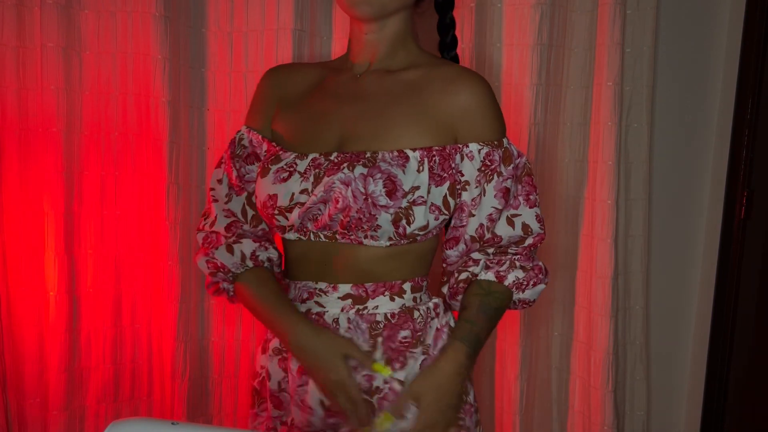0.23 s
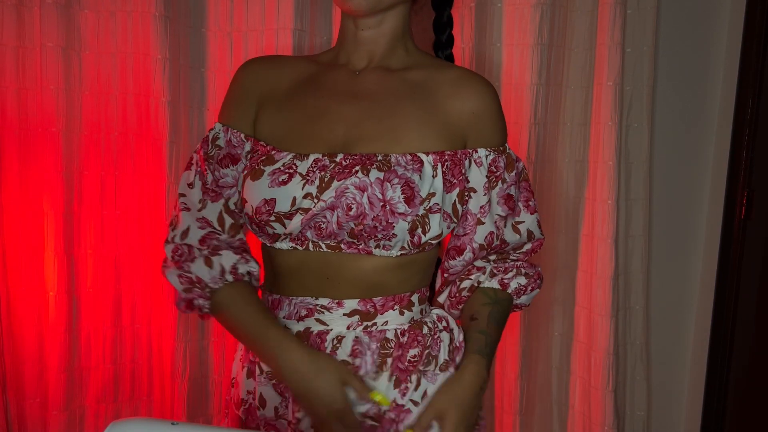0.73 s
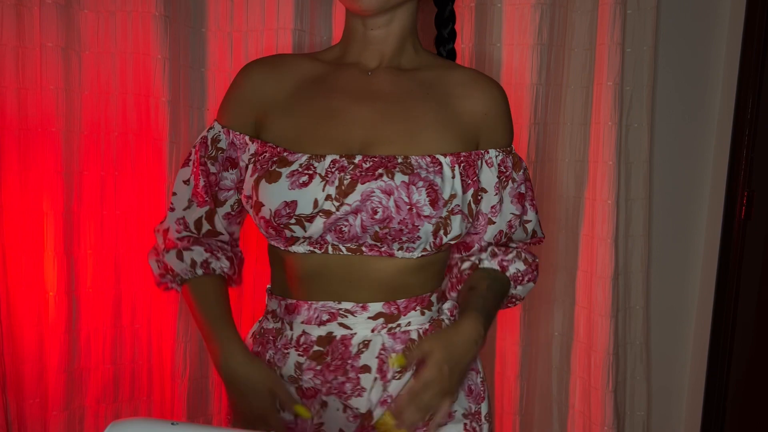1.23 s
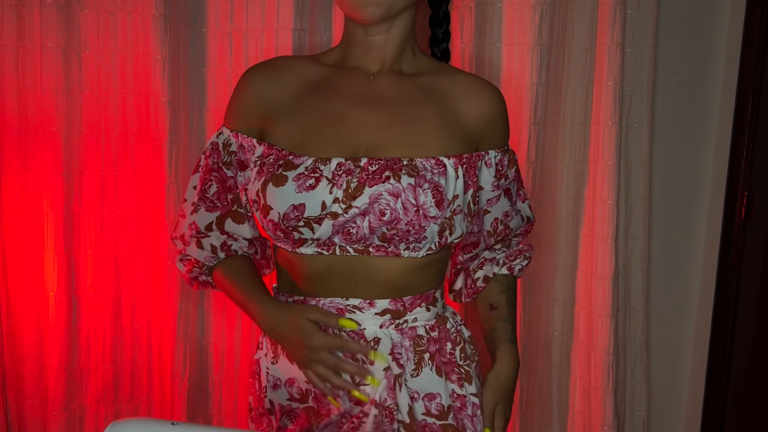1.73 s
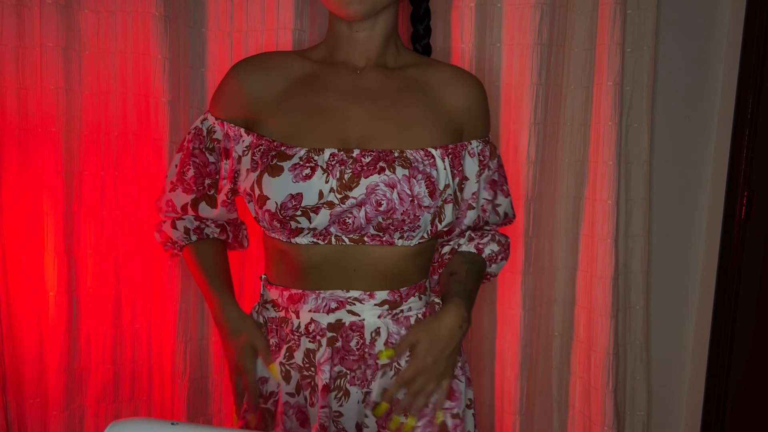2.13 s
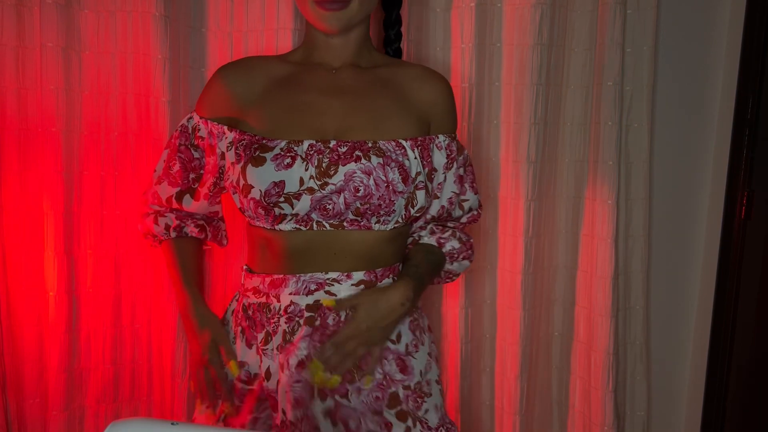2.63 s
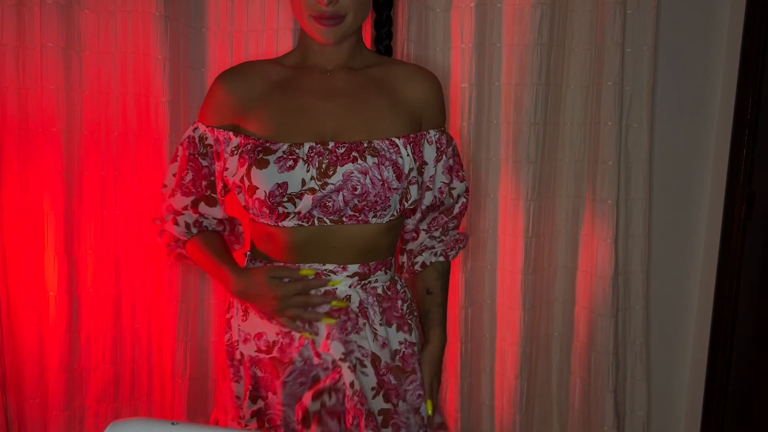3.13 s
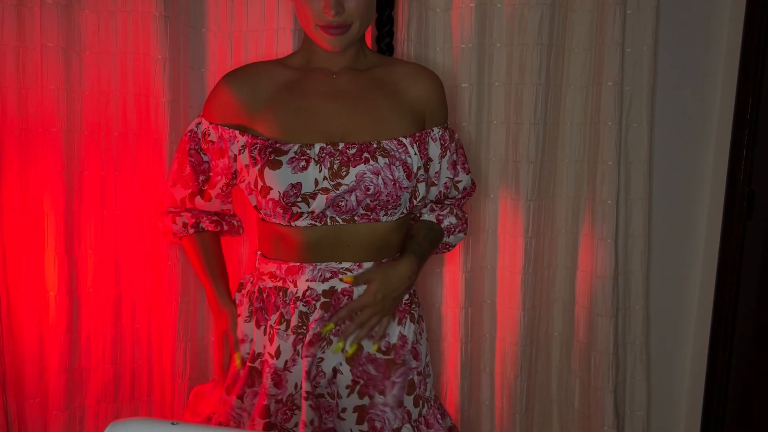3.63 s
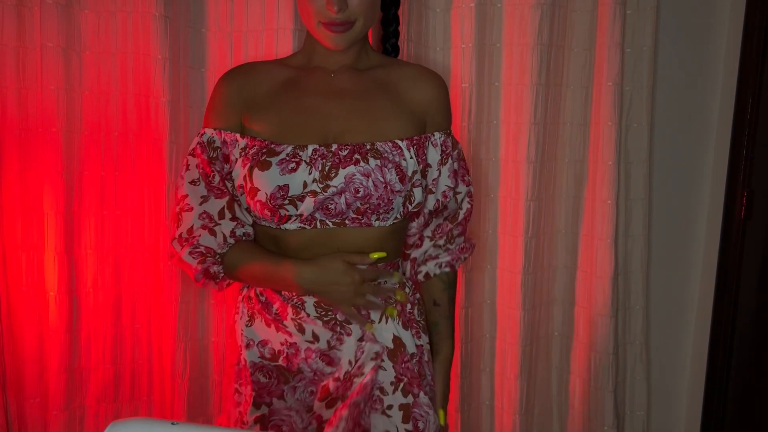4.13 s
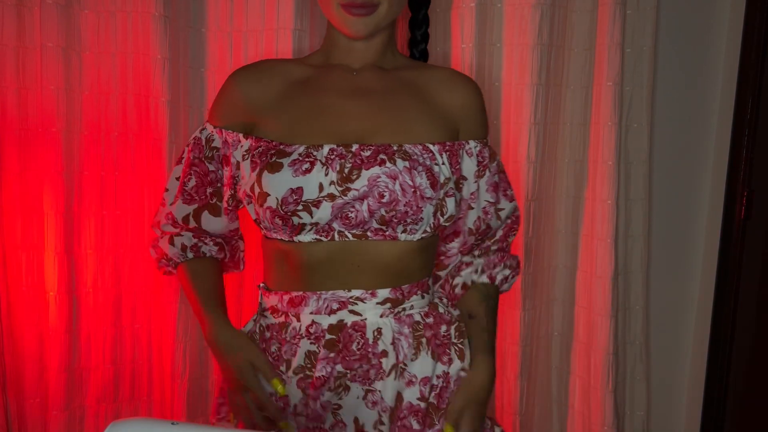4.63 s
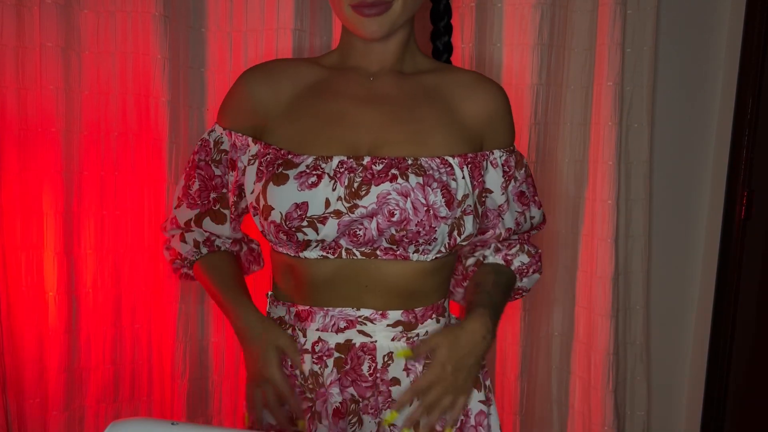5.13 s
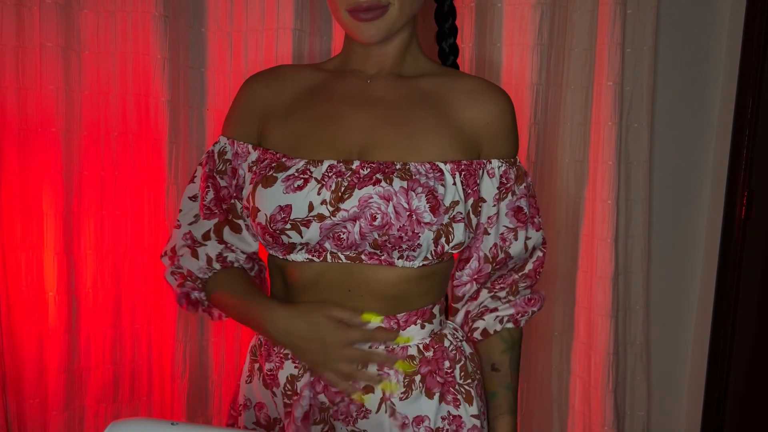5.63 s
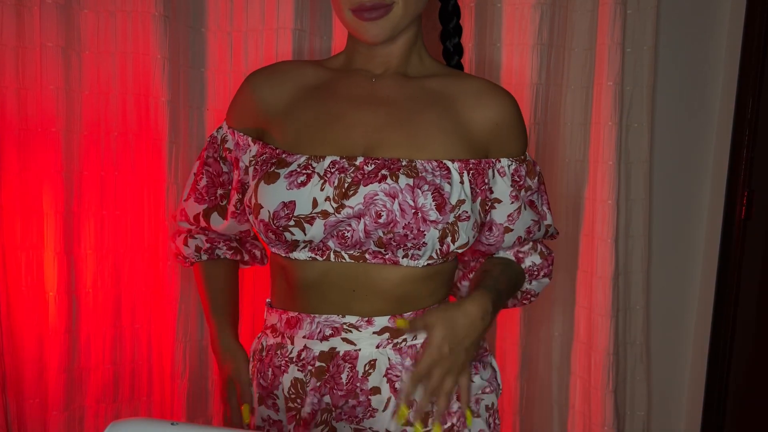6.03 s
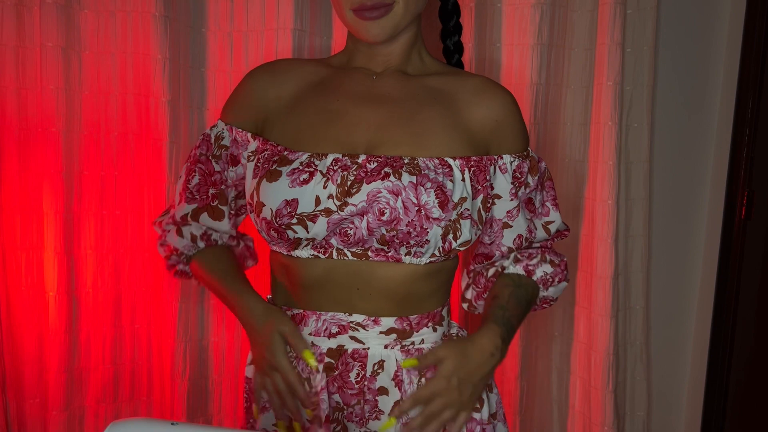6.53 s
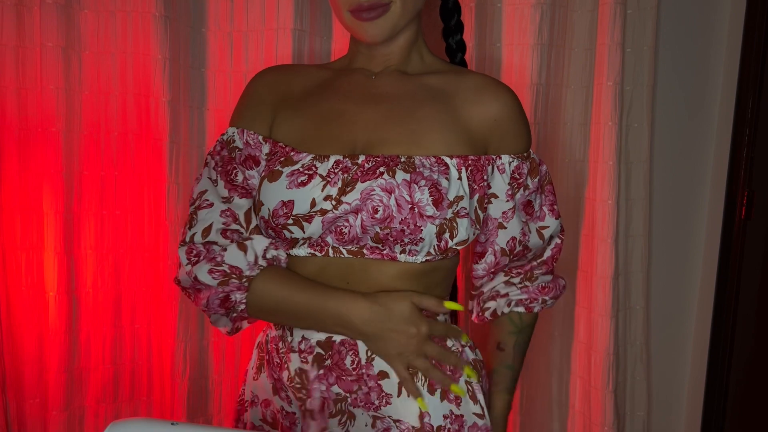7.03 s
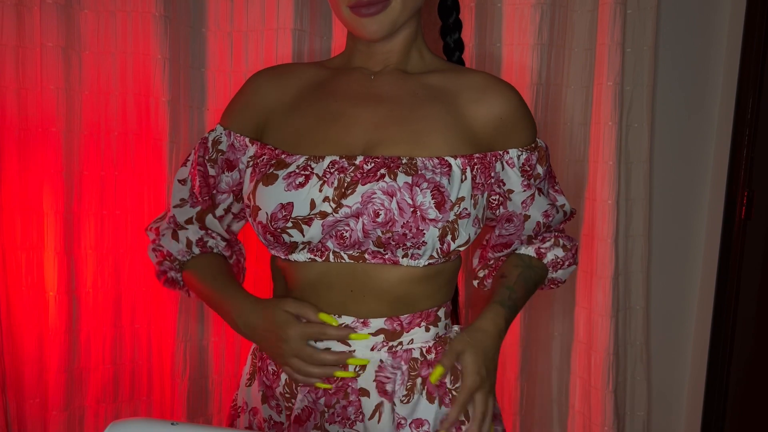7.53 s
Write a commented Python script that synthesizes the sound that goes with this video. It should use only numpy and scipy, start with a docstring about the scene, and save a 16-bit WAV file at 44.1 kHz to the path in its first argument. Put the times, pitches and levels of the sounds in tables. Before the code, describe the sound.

In a quiet room, close to one microphone, long nails rub to and fro over a cotton skirt. Each stroke is a bright, grainy hiss of about a third of a second that swells and sinks as the hand turns. Short zips, small dry snaps of folds and soft low pushes of air from the swinging cloth come irregularly beneath it.

```python
"""A quiet room, one close microphone: long fingernails sweep to and fro over a cotton skirt.
Noise impulses, thread by thread, are coloured as nails, fibres and dragged cloth; the hiss sinks at each turn.
Short noise swells zip where the weave briefly has a pitch, and short damped waves snap as folds pull taut.
The swinging cloth adds low pushes of air, dull fold rustle and a slow heave, over steady room noise."""
import sys
import numpy as np
from scipy import signal
from scipy.fft import rfft, irfft
from scipy.io import wavfile
from scipy.ndimage import uniform_filter1d

SR = 44100
rng = np.random.default_rng(int(sys.argv[2]) if len(sys.argv) > 2 else 0)


def output_pcm(signal):
    """Save a mono or channel-first signal as 16-bit PCM at the path in sys.argv[1].

    Samples are clipped to [-1, 1] before scaling.
    """
    pcm = np.clip(np.atleast_2d(signal).T, -1, 1) * 32767
    wavfile.write(sys.argv[1], SR, np.round(pcm).astype(np.int16))


N = 343098  # samples


def gain_of(db):
    """Decibels to an amplitude factor."""
    return 10 ** (np.asarray(db) / 20)


def evened(x):
    """Scales to an rms of one."""
    return x / np.sqrt(np.mean(x ** 2) + 1e-20)


def coloured(x, points):
    """Filters x by a tone curve drawn over log frequency, then sets its rms to one."""
    point_hz, point_db = np.transpose(points)
    hz = np.fft.rfftfreq(len(x), 1 / SR)
    curve_db = np.interp(np.log(hz + 1), np.log(point_hz + 1), point_db)
    return evened(irfft(rfft(x) * gain_of(curve_db), len(x)))


def slips(per_s, spread_db):
    """Threads let go at random moments, either way, a few much harder than the rest."""
    size = gain_of(spread_db * np.minimum(rng.exponential(1, N), 5))
    lets_go = rng.random(N) < per_s / SR
    return evened(size * rng.standard_normal(N) * lets_go)


def patchy(x, depth_db, frames, bins):
    """Uneven cloth: random louder and softer patches in time and pitch."""
    spectrum = signal.stft(x, nperseg=512, noverlap=384)[2]
    across_pitch = uniform_filter1d(rng.standard_normal(spectrum.shape), bins, 0)
    patches = evened(uniform_filter1d(across_pitch, frames, 1))
    return signal.istft(spectrum * gain_of(depth_db * patches), nperseg=512, noverlap=384)[1][:N]


def resonate(x, hz, width_hz):
    """Lifts a band around the pitch curve hz: shifts it down to zero, smooths twice, shifts back."""
    carrier = np.exp(2j * np.pi * np.cumsum(hz) / SR)
    pole = np.exp(-np.pi * width_hz / SR)
    low = x / carrier
    for _ in range(2):
        low = signal.lfilter([1 - pole], [1, -pole], low)
    return evened((carrier * low).real)


# Strokes of the hand, each from one turn or hesitation to the next; the last row only ends the last stroke.
# Columns: start_s, turn_level_db, turn_slowing_s, nails_level_db, nails_rise_db (along the stroke),
# top_speed_place (0-1), roundness (0 flat to 1 arched), fibre_level_db, fibre_rise_db,
# drag_level_db, drag_rise_db, weave_pitch_hz
HAND_STROKES = [(-0.08, -56, 0.038, -44.4, 2, 0.48, 0.52, -47, 3, -50.5, -0.2, 4380.0),
                (0.182, -55.0, 0.044, -44, -1, 0.7, 0.59, -50.5, 3.7, -49, -3, 4500),
                (0.435, -57.5, 0.033, -43.5, -4, 0.67, 0.36, -49.5, -5, -49, -4, 4220.0),
                (0.715, -56, 0.031, -44.5, -2, 0.76, 0.36, -51, 0.5, -49.5, 0, 4250),
                (0.951, -55.1, 0.023, -44.4, 1, 0.64, 0.55, -51.5, -2, -50, 1, 4230),
                (1.256, -54.5, 0.033, -46, -0.6, 0.3, 0.36, -53.5, 0.7, -51.5, -3, 4170),
                (1.378, -50.5, 0.076, -41.5, 2, 1, 1, -47.8, 5.9, -49.5, 3, 4260),
                (1.694, -45.5, 0.038, -42.5, 0.1, 0.3, 0.43, -46, -0.2, -50, -0.3, 4500.0),
                (1.791, -53.5, 0.045, -41.5, -1.2, 0.51, 0.56, -46, -5, -49.5, 4, 4400),
                (2.08, -53.6, 0.04, -40.5, -4, 0.62, 0.74, -47.5, -2, -50, -2, 4400),
                (2.422, -55.5, 0.039, -43.0, 0.5, 0.37, 0.35, -47, -3.3, -51, 4.5, 4500),
                (2.732, -56.5, 0.033, -42.5, -4.5, 0.51, 0.57, -50.5, -6, -50.5, -4, 4300),
                (3.133, -51.5, 0.046, -45.5, 2.3, 0.66, 0.8, -50.5, -2.5, -53, 1.0, 4560),
                (3.495, -49.5, 0.037, -48, -1.5, 0.36, 0.32, -54, 2, -55, -9, 4300),
                (3.625, -52, 0.069, -46, -0.8, 0.6, 0.46, -52.5, -1.9, -54.9, 6, 4370),
                (3.866, -46.5, 0.033, -44.5, -3, 0.64, 0.47, -49.5, 2.2, -51, -4, 4250),
                (4.239, -58, 0.032, -45, 1, 0.66, 0.59, -48, -1.3, -51, -1, 4440),
                (4.725, -48.5, 0.038, -50, -1, 0.5, 0.51, -54, -0.4, -53, 2, 4440),
                (4.804, -50, 0.054, -49, -3, 0.44, 0.43, -55.5, -1, -55, -4, 4400),
                (4.979, -51.7, 0.077, -44.5, -4, 0.66, 0.36, -49.5, -2, -52, 0, 4400),
                (5.099, -43, 0.052, -41.5, 2.5, 0.66, 0.7, -46.5, 10, -49, 5.5, 4400),
                (5.542, -54.5, 0.048, -42.5, 0.5, 0.62, 0.41, -45, 0, -49, -5, 4450.0),
                (6.017, -46.5, 0.092, -46.5, -3, 0.7, 0.5, -50.8, 4, -56, -2, 4540),
                (6.291, -53.5, 0.059, -46.5, -2, 0.7, 0.31, -51, 0.8, -53, -0.5, 4600.0),
                (6.402, -45, 0.031, -41.9, 0.5, 0.9, 0.19, -47, 3.7, -49.5, 1, 4470),
                (7.049, -51.5, 0.069, -50.7, 6, 0.47, 0.38, -51, 1.3, -57.5, 6, 4700),
                (7.122, -51.5, 0.037, -48.5, -1, 0.5, 0.4, -49, 8, -55, -5, 4700),
                (7.572, -47.5, 0.041, -43, 3.3, 0.5, 0.66, -47.5, -4.5, -53, 2, 4950),
                (8.0, -53.0, 0.07, -44.0, 0.0, 0.5, 0.5, -47.0, 0.0, -54.0, 0.0, 4700.0)]
FIBRE_SINK, DRAG_SINK = 1.02, 1.07  # times the nails' sink in dB as the hand slows
WEAVE_LIFT = 0.035  # share by which the weave's pitch rises towards a turn
WOBBLE_DB, WOBBLE_S = 0.47, 0.023  # the pressure of the nails wavers: rms depth, smoothing
FIBRE_LAG_S = 0.0047  # the fibres answer the hand a little late


def strokes():
    """Levels and weave pitch, sample by sample: each stroke arches between two turns of the hand."""
    rows, t = np.array(HAND_STROKES), np.arange(N) / SR
    stroke = np.clip(np.searchsorted(rows[:, 0], t) - 1, 0, len(rows) - 2)
    (start, turn_db, turn_s, nails_db, nails_rise, place, rounded,
     fibre_db, fibre_rise, drag_db, drag_rise, weave_hz) = rows[stroke].T
    end, next_db, next_s = rows[stroke + 1, :3].T
    u = (t - start) / (end - start)  # progress through the stroke
    place, rounded = np.clip(place, .1, .9), np.clip(rounded, 0, 1)

    rising = u < place
    far = np.where(rising, 1 - u / place, (u - place) / (1 - place))  # 0 at full speed, 1 at a turn
    # blend a full-length arch with a brief dip beside each turn
    leaving = rounded * rising * far ** 2 + (1 - rounded) * np.exp(-((t - start) / turn_s) ** 2)
    arriving = rounded * ~rising * far ** 2 + (1 - rounded) * np.exp(-((end - t) / next_s) ** 2)
    top_db = nails_db + nails_rise * (u - .5)
    sink_db = leaving * (turn_db - top_db) + arriving * (next_db - top_db)

    size = round(WOBBLE_S * SR)
    waver = uniform_filter1d(uniform_filter1d(rng.standard_normal(N), size), size)
    wobble_db = WOBBLE_DB * evened(waver)

    def smooth(curve):
        """Rounds the steps between strokes over 600 samples."""
        return uniform_filter1d(curve, 600, mode="nearest")

    fibre_curve = smooth(fibre_db + fibre_rise * (u - .5) + FIBRE_SINK * sink_db)
    drag_curve = smooth(drag_db + drag_rise * (u - .5) + DRAG_SINK * sink_db)
    return (top_db + sink_db + wobble_db,
            np.interp(t - FIBRE_LAG_S, t, fibre_curve) + wobble_db,
            drag_curve + wobble_db,
            smooth(weave_hz * (1 + WEAVE_LIFT * (leaving + arriving))))


# Tone curves of the nails, the fibres and the dragged cloth. Columns: frequency_hz, relative_level_db (per Hz)
NAIL_TONE = [(900, -44), (1800, -34), (2800, 1), (4500, 0), (6500, -0.5), (9000, -0.5), (12000, -3)]
FIBRE_TONE = [(4000, -43), (7500, -3.5), (9500, -0.5), (12300, 2), (16000, -5.5)]
DRAG_TONE = [(500, -20.5), (950, -5.5), (1300, -1), (1800, 0.5), (2500, -1.5), (4000, -42)]


def scratching(nails_db, fibre_db, drag_db, weave_hz):
    """One shower of slipping threads sounds in the nails, the fibres and the stretched cloth."""
    shower = patchy(slips(per_s=36000, spread_db=1.07), depth_db=0.64, frames=16, bins=5)
    # single taut threads ring a little longer: narrow streaks
    shower = patchy(shower, depth_db=1.97, frames=24, bins=1)
    # each stroke has its own weave pitch, a little higher near the turns; a broad band around it is lifted
    weave = resonate(shower, weave_hz, width_hz=6600)
    nails = coloured(weave + 0.26 * evened(shower), NAIL_TONE)
    fibres = coloured(shower, FIBRE_TONE)
    drag = coloured(shower, DRAG_TONE)
    return gain_of(nails_db) * nails + gain_of(fibre_db) * fibres + gain_of(drag_db) * drag


# A nail zips over a taut patch and the weave briefly has a pitch.
# Columns: middle_s, level_db, pitch_hz, width_hz, half_length_s
TAUT_ZIPS = [(.07, -48.5, 1950, 500, 0.034), (0.514, -50, 3020, 700, .04), (.565, -44, 1890, 700, 0.073),
             (.787, -67, 1850, 400, .03), (1.064, -45, 1870, 400, 0.022), (1.193, -45, 3670, 450, 0.019),
             (1.622, -47, 3840, 1300, 0.045), (1.984, -49, 2760, 500, 0.047), (2.497, -49, 3900, 1200, .03),
             (3.532, -52, 1500, 900, 0.027), (3.965, -46, 3450, 1200, 0.043),
             (5.037, -57, 3490, 500, 0.024), (5.178, -59, 5380, 500, .04), (5.353, -48.5, 1650, 400, 0.034),
             (5.458, -52, 1830, 412, .03), (5.402, -41.5, 4800, 1500, 0.036),
             (5.86, -43.5, 3900, 1400, 0.067), (6.5, -49, 4300, 1500, 0.041),
             (6.756, -45, 4460, 1800, 0.056)]


def zips():
    """Short swells of noise, each in a band around its own fixed pitch."""
    out, threads = np.zeros(N), rng.standard_normal(N)
    for middle_s, level_db, pitch_hz, width_hz, half_s in TAUT_ZIPS:
        span = slice(max(round((middle_s - half_s) * SR), 0), round((middle_s + half_s) * SR))
        part = threads[span]
        band = resonate(part, np.full(len(part), pitch_hz), width_hz)
        out[span] += gain_of(level_db) * band * np.hanning(len(part))
    return out


# Folds snapping taut and nails snagging.
# Columns: middle_s, level_db, pitch_hz, length_cycles, side (1 or -1), air_push_level_db
FOLD_SNAPS = [(0.2154, -30.5, 570, 1.15, 1, -42), (0.328, -38, 900, 0.54, 1, -32.5),
              (0.3828, -34, 1290, 1.4, 1, -55), (.4200, -44, 596, 0.99, -1, -56.5),
              (0.5226, -42, 500, 1.4, 1, -51), (0.9016, -27, 1340, 1.1, 1, -30),
              (1.332, -37, 228, 0.96, 1, -43), (1.3423, -42, 480, 1.2, 1, -58),
              (1.5180, -30.5, 2600, 1.6, 1, -65), (1.6368, -39, 820, 1.2, -1, -43),
              (1.6416, -36, 724, 3.1, 1, -47), (2.193, -35, 1500, 0.65, -1, -57),
              (2.842, -32, 1090, 0.81, 1, -45), (3.1330, -41, 710, 1.7, 1, -40),
              (3.3277, -45, 670, 1.8, 1, -63), (3.7900, -46, 560, 1.2, -1, -60),
              (4.7920, -42, 486, 1.2, 1, -50), (5.175, -41, 600, 0.63, -1, -37),
              (5.253, -39, 2920, 1.2, -1, -65), (5.5140, -44, 666, 1.3, -1, -55),
              (5.5515, -36.5, 450, 0.63, -1, -60), (5.8061, -48, 500, 1.2, 1, -38),
              (6.2000, -30, 2120, 1, 1, -60), (6.588, -29, 2260, 1.8, 1, -58),
              (6.5578, -51, 406, 1.1, 1, -60), (7.2755, -37.5, 900, 0.65, -1, -58),
              (7.3610, -44.5, 470, 1.2, 1, -44), (7.4760, -34, 3500, .5, 1, -65),
              (7.5900, -36, 2860, 1.4, -1, -67)]


def snaps():
    """A cycle or two of the tightened cloth, then a slower push of air."""
    lead = 300  # samples before the middle of the snap
    out, t = np.zeros(N + SR), np.arange(-lead, 1500) / SR
    u = np.maximum(t, 0) / 0.0022  # time in units of 2.2 ms
    push = u * (u - 2) * np.exp(-u) * 2  # swings one way, then back
    for middle_s, level_db, pitch_hz, cycles, side, push_db in FOLD_SNAPS:
        snap = np.cos(2 * np.pi * pitch_hz * t - .4) * np.exp(-(2.0 * pitch_hz * t / cycles) ** 2)
        at = round(middle_s * SR) - lead
        out[at:at + len(t)] += np.sign(side) * (gain_of(level_db) * snap + gain_of(push_db) * push)
    return out[:N]


# Swings of the skirt. Columns: middle_s, air_level_db, folds_level_db, heave_level_db, half_length_s
SKIRT_SWINGS = [(0.092, -46.5, -50, -46, 0.076), (.22, -56, -52, -60, .03),
                (0.336, -47.5, -53.5, -47, 0.094), (.52, -43, -70, -49, 0.038),
                (0.598, -43.5, -47.5, -41, 0.048), (0.714, -48, -55, -42, 0.069),
                (0.882, -44.5, -51, -47.5, .06), (1.108, -44.5, -48.5, -48, 0.036),
                (1.198, -48, -53.5, -35.5, 0.047), (1.33, -48, -51.5, -44, 0.098),
                (1.573, -47.5, -49.5, -56, 0.048), (1.67, -44.5, -49.5, -46.5, 0.051),
                (1.943, -46, -55, -49, 0.09), (2.2, -54, -51, -43, 0.025),
                (2.302, -46, -51.5, -49.5, 0.066), (2.58, -48, -56, -57, 0.049),
                (2.672, -48.5, -52, -58, 0.069), (2.86, -49.5, -54, -58, 0.071),
                (3.042, -62, -58.5, -59, 0.079), (3.366, -58, -56, -56, .08), (3.508, -54, -53, -58, 0.087),
                (3.777, -58, -55, -68, .05), (4.07, -49.5, -64, -56, 0.058), (4.5, -59.5, -60, -63, 0.45),
                (4.76, -45.5, -54, -47, 0.088), (5.05, -49, -54, -55, 0.048),
                (5.175, -48, -57, -46.5, 0.096), (5.372, -45, -71, -45.5, 0.14),
                (5.707, -51, -69, -53, 0.17), (5.83, -47, -62, -45, 0.036), (5.955, -42, -54.5, -43, 0.028),
                (6.023, -43.5, -54.5, -43, 0.039), (6.13, -50.5, -61, -50, .03),
                (6.226, -47, -58, -41.5, 0.028), (6.39, -50.5, -56, -55, 0.066),
                (6.605, -49.5, -59, -48.5, 0.13), (6.86, -46, -58, -45.5, .07),
                (7.0, -49.5, -60.5, -51, .07), (7.354, -56.5, -62.5, -60, 0.35),
                (7.543, -46.5, -64, -50, 0.044), (7.657, -53, -62, -50.5, 0.054),
                (7.78, -43.5, -60, -66, 0.11)]
SWING_FALL_DB = 8.5  # fall over one half length


def swings(db, stretch=1):
    """Gain that swells to each swing and falls away from it; overlapping swings add in power."""
    rows = np.array(SKIRT_SWINGS)
    middle_s, half_s = rows[:, :1], rows[:, -1:]
    t = np.arange(0, N + 64, 64) / SR
    power = gain_of(db[:, None] - SWING_FALL_DB * abs(t - middle_s) / (stretch * half_s)) ** 2
    return np.interp(np.arange(N) / SR, t, np.sqrt(power.sum(0)))


# Tone curves of the pushed air, the folds and the slow heave. Columns: frequency_hz, relative_level_db (per Hz)
AIR_TONE = [(25, -15), (48, -1.5), (90, -6.5), (180, -16), (400, -46.5)]
FOLD_TONE = [(90, -11.5), (190, 0), (350, -3), (650, -5), (1000, -9), (2000, -45)]
HEAVE_TONE = [(3, -26), (10, -4), (19, 8.5), (35, 5), (70, -35.5)]
HEAVE_STRETCH = 1.48  # the heave lasts this many times longer
AIR_UNDER_DB, FOLDS_UNDER_DB = -19.5, -18  # between swings the cloth stirs this far under the nails


def skirt(nails_db):
    """Lumpy pressure from the swinging cloth, and the dull creases of its folds."""
    _, air_db, folds_db, heave_db, _ = np.transpose(SKIRT_SWINGS)
    air = coloured(slips(per_s=900, spread_db=2.5), AIR_TONE)
    folds = coloured(slips(per_s=1500, spread_db=1.5), FOLD_TONE)
    heave = coloured(rng.standard_normal(N), HEAVE_TONE)
    air_gain = np.hypot(swings(air_db), gain_of(nails_db + AIR_UNDER_DB))
    folds_gain = np.hypot(swings(folds_db), gain_of(nails_db + FOLDS_UNDER_DB))
    return air_gain * air + folds_gain * folds + swings(heave_db, HEAVE_STRETCH) * heave


# Tone curve of the quiet room. Columns: frequency_hz, relative_level_db (per Hz)
ROOM_TONE = [(20, 5.5), (130, -5.5), (320, -12), (800, -12.5), (5000, -27), (16000, -42)]


def room():
    """Steady noise, strongest in the bass, at a fixed rms level."""
    return gain_of(-60.5) * coloured(rng.standard_normal(N), ROOM_TONE)


def scene():
    """One microphone feeds both channels."""
    hand = strokes()
    nails_db = hand[0]
    mono = scratching(*hand) + zips() + snaps() + skirt(nails_db) + room()
    return np.tile(mono, (2, 1))


# The microphone's dip in the treble. Columns: centre_hz, width_hz, depth_db
TREBLE_DIP = (9170, 1220, -4)
EDGE_HZ = 15750  # upper band limit


def record(dry):
    """A bell-shaped dip in the microphone's treble, then a steep low-pass at the band limit."""
    dip_hz, width_hz, depth_db = TREBLE_DIP
    hz = np.fft.rfftfreq(N, 1 / SR)
    dip_db = depth_db * np.exp(-((hz - dip_hz) / width_hz) ** 2)
    heard = irfft(rfft(dry) * gain_of(dip_db), N)
    low_pass = signal.firwin(1023, EDGE_HZ, window=("kaiser", 9), fs=SR)
    return signal.oaconvolve(heard, low_pass[None], "same")


dry = scene()
out = record(dry)
output_pcm(out)
```